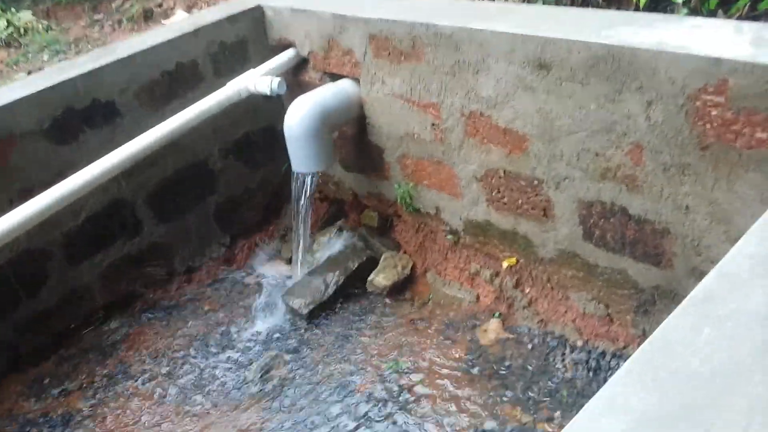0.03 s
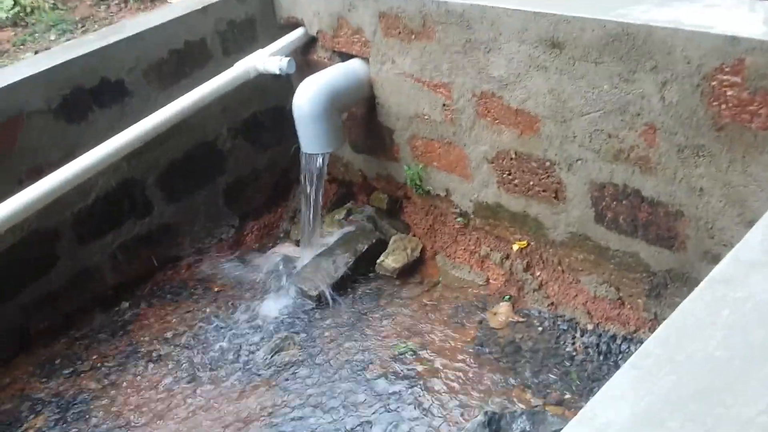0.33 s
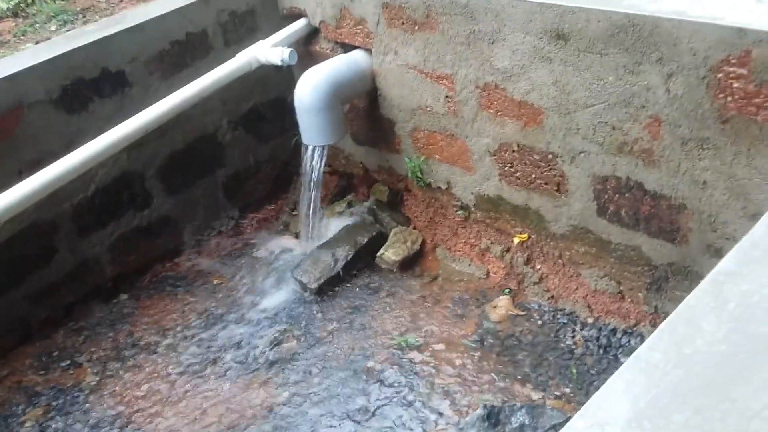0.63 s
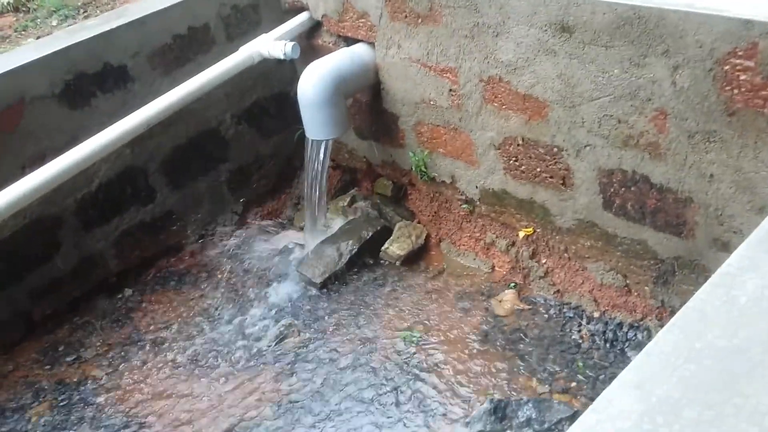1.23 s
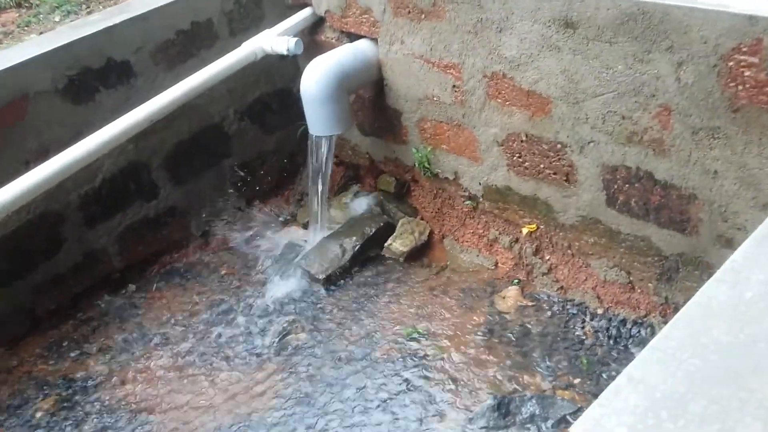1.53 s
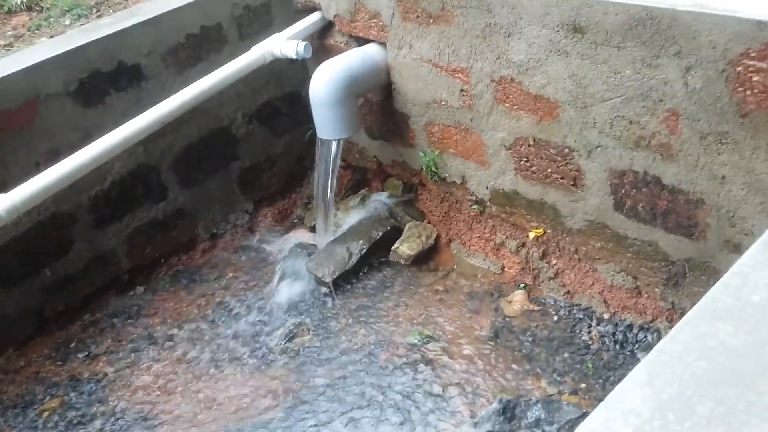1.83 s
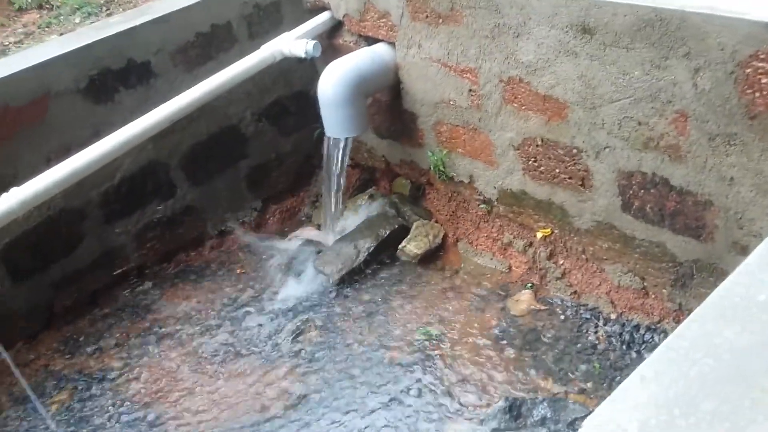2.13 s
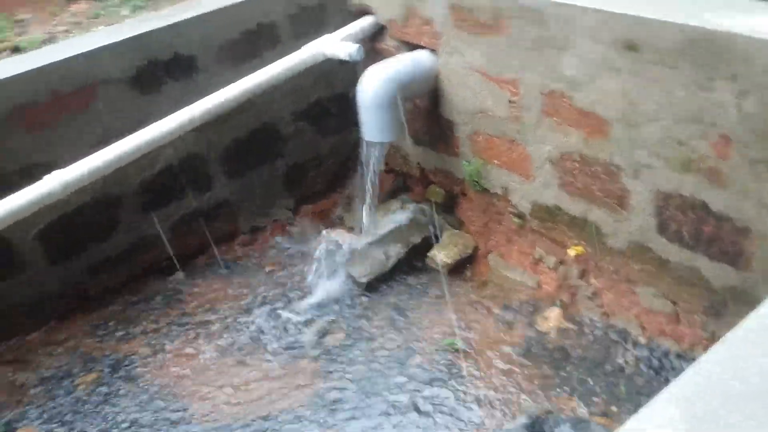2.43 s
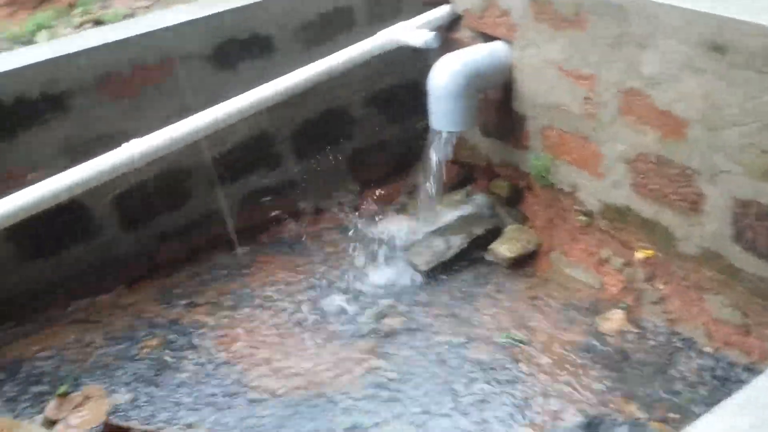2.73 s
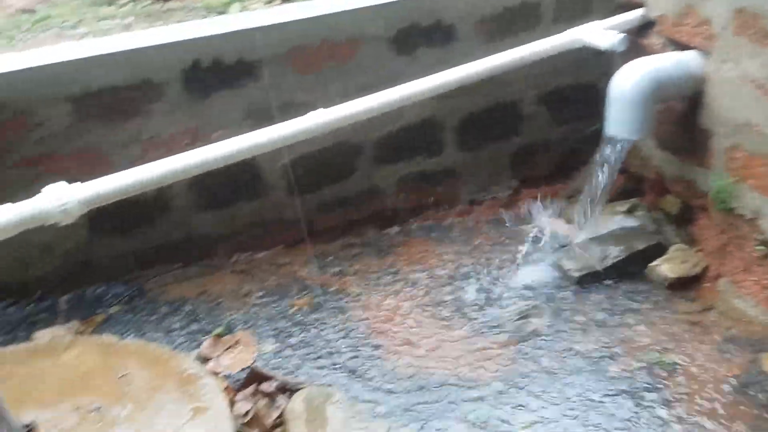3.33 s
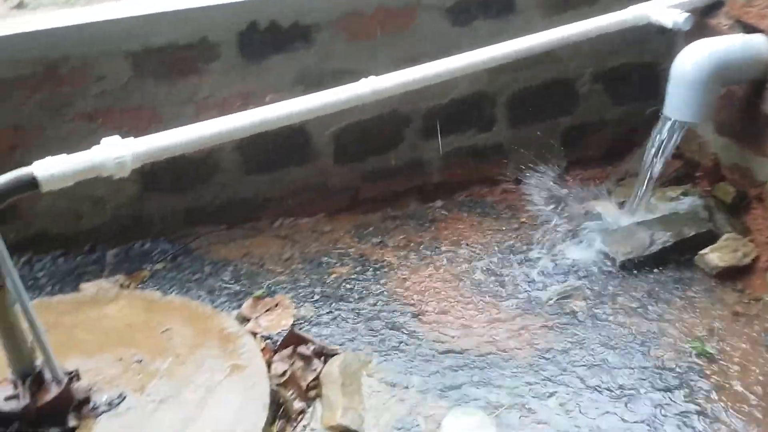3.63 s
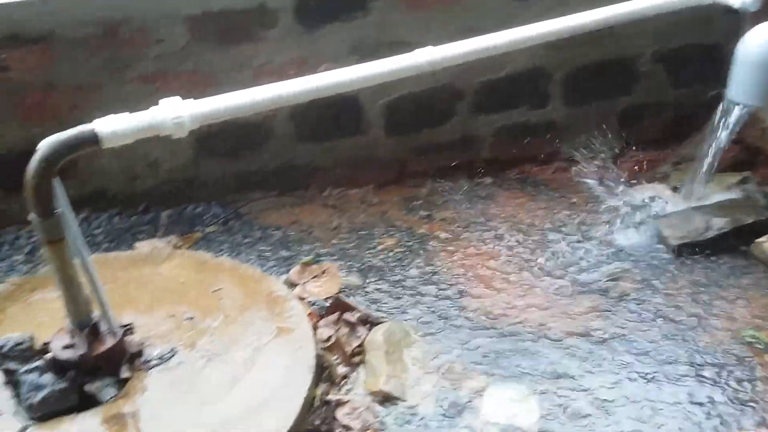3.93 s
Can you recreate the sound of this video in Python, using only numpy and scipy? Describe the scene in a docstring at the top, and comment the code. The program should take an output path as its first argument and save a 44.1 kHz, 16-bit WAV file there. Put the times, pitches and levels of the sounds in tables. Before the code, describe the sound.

A close, steady splash of water falling on a stone slab, with scattered raindrops.

```python
"""Close to a pipe pouring onto a stone slab and into a shallow pool between brick walls; one mono mic.
From the start the jet breaks into a fizz of droplets and tiny bubbles, and lumps of water slap the slab.
Light rain ticks, larger bubbles plink and spray flies. A breeze buffets the mic, hardest near 1.4 s.
From 2.57 to 3.6 s the mic steps aside and the splash changes colour; one more buffet follows at 3.7 s."""
import sys
import numpy as np
from scipy import signal
from scipy.fft import rfft, irfft
from scipy.io import wavfile

SR = 44100
rng = np.random.default_rng(int(sys.argv[2]) if len(sys.argv) > 2 else 0)


def wav_record(signal):
    """Record a signal, one row per channel, as 16-bit PCM in the file named by sys.argv[1]."""
    frames = np.transpose(np.atleast_2d(signal))
    bounded = np.clip(frames, -1, 1)
    # unit amplitude maps onto the largest positive 16-bit level
    quanta = np.round(bounded * 32767).astype(np.int16)
    wavfile.write(sys.argv[1], SR, quanta)


N = 176400
T = np.arange(N) / SR
DURATION_S = N / SR


def undb(db):
    """Decibels to gain."""
    return 10 ** (np.asarray(db) / 20)


def unit(x):
    """Scale to rms 1."""
    return x / np.sqrt(np.mean(x ** 2))


def curve(rows):
    """Join (t/s, value) rows by straight lines."""
    return np.interp(T, *np.array(rows).T)


def add(out, at, x):
    """Mix x into out at a time in seconds."""
    i = int(np.clip(at * SR, 0, N - 1))
    out[i:i + len(x)] += x[:N - i]


def scatter(per_s):
    """Random events as rows of t/s, size, pitch; the last two run from 0 to 1."""
    return rng.random((int(per_s * DURATION_S), 3)) * [DURATION_S, 1, 1]


def wander(hz):
    """Random drift of rms 1 that turns hz times a second."""
    return unit(np.interp(T * hz, np.arange(4000), rng.standard_normal(4000)))


def colour(x, points):
    """Minimum-phase filter through (f/Hz, gain/dB) points."""
    hz, db = np.array(points).T
    f = np.arange(N // 2 + 1) * SR / N + 1
    gain = undb(np.interp(np.log(f), np.log(hz), db))
    cepstrum = irfft(np.log(gain), N)
    cepstrum[1:N // 2] *= 2
    cepstrum[N // 2 + 1:] = 0
    return irfft(rfft(x) * np.exp(rfft(cepstrum)), N)


def band(x, hz, width):
    """Bell-shaped band of x around hz, at rms 1; width is a share of the centre."""
    f = np.arange(N // 2 + 1) * SR / N + 1
    return unit(irfft(rfft(x) * np.exp(-2 * (np.log(f / hz) / width) ** 2), N))


def fizz(classes=16, decay_cycles=3.44, rise_per_cycle=0.0056):
    """Swarms of tiny bubbles ring for a few cycles, rising in pitch; the smaller, the more of them."""
    out = np.zeros(N)
    edges_hz = np.geomspace(700, 15500, classes + 1)
    for low, high in zip(edges_hz, edges_hz[1:]):
        t = T[:int(5 * decay_cycles / low * SR)]
        swarm = np.zeros(N)
        for at, size, pitch in scatter(per_s=312.5 * np.sqrt(low / 4000)):
            cycles = (low + (high - low) * pitch) * t
            db = 5 * min(-np.log(size), 3)
            ring = np.sin(2 * np.pi * cycles * (1 + rise_per_cycle * cycles))
            add(swarm, at, undb(db) * np.exp(-cycles / decay_cycles) * ring)
        out += unit(swarm) * np.sqrt(high - low)  # equal power per Hz in every size class
    return unit(out)


def droplets(per_s=4500, spread_db=4.5):
    """Droplets land as randomly timed clicks of uneven size."""
    lands = rng.random(N) < per_s / SR
    strength = undb(spread_db * np.minimum(rng.standard_normal(N), 2))
    return unit(lands * strength * rng.choice([-1, 1], N))


def splash(step_start_s=2.57, step_end_s=3.6):
    """Fizz, droplets and a smooth wash surge with the jet; their colour turns as the mic steps aside."""
    # loudness of the splash at the mic: t/s, level/dB
    flow = [(0, -27), (.3, -25.5), (.47, -27.5), (.58, -26), (.72, -27), (.85, -27), (1.0, -27.5),
            (1.2, -26.5), (1.45, -27.5), (1.65, -26.5), (2, -26), (2.11, -28), (2.2, -26), (2.35, -26.5),
            (2.4, -27), (2.8, -27), (3.05, -28), (3.24, -25.5), (3.31, -27.5), (3.42, -27.5), (3.66, -26),
            (3.74, -28), (3.9, -26), (4, -28.5)]
    # its colour with the mic facing the pipe: f/Hz, gain/dB
    front_colour = [(100, -17), (250, -5), (500, -8), (730, -8.5), (1060, -1), (1430, -5), (1850, 0),
                    (2150, -3), (2500, -6), (2900, -9.5), (3500, -7), (4170, -0.9), (4650, -2),
                    (5100, -1.4), (6200, -4.5), (7600, -9), (8700, -9), (11000, -15.5), (15500, -23)]
    # its colour from the side: f/Hz, gain/dB
    side_colour = [(100, -4), (250, -2.5), (550, -8.5), (750, -9.5), (1020, -2.5), (1500, -3.5), (2050, 0),
                   (2500, -3), (3400, -7), (4200, -4.5), (5200, -2), (6800, -4), (8000, -7), (9500, -15),
                   (11500, -14.5), (15500, -23)]
    water = fizz() + undb(1) * droplets() + undb(1.5) * rng.standard_normal(N)
    water *= undb(0.72 * wander(hz=44.85))  # slight, fast surges
    front = unit(colour(water, front_colour))
    side = unit(colour(water, side_colour))
    aside = np.clip((T - step_start_s) / (step_end_s - step_start_s), 0, 1)
    return undb(curve(flow)) * ((1 - aside) * front + aside * side)


def mist(level_db=-52.5, flicker_db=6):
    """The finest droplets sizzle in quick uneven puffs."""
    puffs = undb(level_db + flicker_db * wander(hz=55))
    return puffs * band(rng.standard_normal(N), hz=10100, width=0.54)


def slap(hz, contact_ms, damping, lead_s):
    """A push on the stone at lead_s (short: a smack, long: a plop), then a damped swing of the water."""
    omega = 2 * np.pi * np.fft.rfftfreq(1024, 1 / SR)
    s, resonance = 1j * omega, 2 * np.pi * hz
    push = np.exp(-.5 * (omega * contact_ms / 1000) ** 2 - s * lead_s)
    swing = s ** 2 / (s ** 2 + damping * resonance * s + resonance ** 2)
    hit = irfft(push * swing)
    return hit / np.abs(hit).max()


def slaps(lead_s=0.002013, spatter_s=0.0026, slosh_s=0.0039):
    """Big lumps of water hit the slab, spatter and slosh off it; small ones patter in between."""
    # big lumps landing: t/s, peak/dB, f/Hz, contact/ms, damping (bandwidth over f)
    lumps = [(0.1083, -12.5, 1150, 0.13, 0.74), (0.166, -16, 243, 0.28, 0.99),
             (0.1848, -12.5, 333, 0.15, 0.31), (0.3312, -13.5, 388, 0.42, 0.78),
             (0.3549, -18.5, 330, 0.66, 1.7), (0.3741, -16, 328, 0.17, 0.53), (0.3872, -11, 330, 0.35, 1.8),
             (0.4451, -13.5, 280, 0.12, 0.47), (0.7481, -15.5, 390, 0.11, 0.39),
             (0.8105, -18, 390, 0.45, 0.72), (0.815, -20.5, 390, 0.16, 0.45),
             (0.9145, -12.5, 280, 0.084, 2.5), (1.3657, -13, 240, 0.11, 0.41),
             (1.4159, -15, 330, 0.083, 0.8), (1.5086, -10.5, 327, 0.065, 0.39),
             (1.5129, -19, 330, 0.086, 0.45), (1.5918, -11.5, 200, 0.13, 0.48),
             (1.6118, -11, 1150, 0.13, 0.45), (1.6284, -12.5, 170, 0.12, 1.5),
             (1.7448, -13.5, 240, 0.44, 1.7), (1.7471, -18, 550, 0.06, 1.1),
             (1.7934, -19.5, 390, 0.17, 0.38), (1.8385, -17, 240, 0.31, 0.58),
             (1.8898, -13, 280, 0.11, 1.1), (1.9333, -16, 280, 0.15, 0.73), (2.0504, -18, 280, 0.49, 1.2),
             (2.0707, -11.5, 278, 0.15, 0.6), (2.1371, -17, 330, 0.11, 0.45), (2.1672, -15, 280, 0.19, 0.8),
             (2.1871, -15, 705, 0.57, 0.53), (2.2016, -12.0, 330, 0.1, 1.5),
             (2.2114, -15.5, 1150, 0.2, 1.5), (2.2321, -12, 327, 0.11, 0.45),
             (2.2421, -18, 328, 0.13, 0.37), (2.282, -16.0, 330, 0.17, 0.38), (2.6152, -15, 240, 0.17, 1.1),
             (2.6488, -16.5, 240, 0.1, 0.4), (2.6771, -18.5, 280, 0.18, 1.7),
             (2.7188, -15, 278, 0.15, 0.35), (2.7896, -12.5, 390, 0.37, 1.5), (2.83, -16, 285, 0.15, 0.5),
             (2.9936, -15, 197, 0.15, 0.45), (3.022, -18.5, 550, 0.52, 1.5), (3.0524, -9, 550, 0.12, 1.5),
             (3.1668, -16, 170, 0.17, 0.59), (3.2382, -13.5, 330, 0.12, 0.6),
             (3.364, -14.0, 280, 0.27, 0.51), (3.3684, -25, 390, 0.12, 0.5),
             (3.4541, -18.0, 240, 0.17, 0.51), (3.4776, -18.5, 280, 0.24, 1.5),
             (3.5138, -14, 170, 0.18, 1.3), (3.782, -21.5, 240, 0.77, 1.1), (3.9715, -19, 280, 0.15, 0.65),
             (3.979, -22, 330, 0.3, 0.6)]
    hits, spatter, slosh = np.zeros((3, N))
    t = T[:2048]
    for at, db, hz, contact_ms, damping in lumps:
        add(hits, at - lead_s, undb(db) * slap(hz, contact_ms, damping, lead_s))
        add(spatter, at, undb(db - 12.5) * np.exp(-t / spatter_s))
        add(slosh, at, undb(db - 20.5) * t / slosh_s * np.exp(1 - t / slosh_s))
    for at, size, pitch in scatter(per_s=55):
        patter = slap(hz=190 * 4 ** pitch, contact_ms=0.15, damping=0.56, lead_s=lead_s)
        add(hits, at, undb(-31 + 10 * size) * patter)
    slosh *= band(rng.standard_normal(N), hz=386, width=1.0)
    spatter *= band(rng.standard_normal(N), hz=1300, width=0.99)
    return hits + slosh + spatter


def tick(hz, decay_cycles=0.72):
    """One drop bursts on something hard and dies within a cycle or two."""
    cycles = hz * T[:128]
    return np.exp(-cycles / decay_cycles) * np.cos(2 * np.pi * cycles)


def rain(centre_hz=5200):
    """Lone drops tick on the wall and the pipes, each at its own pitch; a few land close by."""
    # raindrops close to the mic: t/s, peak/dB, f/Hz
    close_drops = [(0.215, -18, 6200), (0.503, -14, 5000), (1, -6, 4500), (1.1207, -12, 4800),
                   (1.2048, -13, 4000), (1.8163, -15, 8400), (2.0439, -9, 5700), (2.315, -8, 4000),
                   (3.1062, -12, 2750), (3.167, -23, 2100), (3.6385, -13, 5500)]
    out = np.zeros(N)
    for at, db, hz in close_drops:
        add(out, at, undb(db) * tick(hz))
    for at, size, pitch in scatter(per_s=90):
        add(out, at, undb(-17 - 17 * size) * tick(centre_hz * 2 ** (pitch - .5)))
    return out


def plink(hz, decay_cycles, swell_cycles=2.5):
    """One bubble swells and rings out."""
    cycles = hz * T[:SR // 20]
    swell = 1 - np.exp(-(cycles / swell_cycles) ** 2)
    ring = swell * np.exp(-cycles / decay_cycles) * np.sin(2 * np.pi * cycles)
    return ring / ring.max()


def bubbles(low_hz=1516, high_hz=5890):
    """A few larger bubbles plink; many fainter ones ping in the pool."""
    # bubbles that stand out of the fizz: t/s, peak/dB, f/Hz
    large_bubbles = [(.375, -17, 4140), (1.1975, -18, 4270), (1.203, -14, 4120), (1.207, -20, 4170),
                     (1.509, -29.5, 393), (3.365, -25, 566), (1.956, -16, 4970), (3.1012, -12, 1980),
                     (3.108, -20, 1880), (3.117, -21, 2100), (3.724, -24, 2870), (3.741, -22, 2060),
                     (3.778, -18, 2100), (3.871, -22, 2300)]
    out = np.zeros(N)
    for at, db, hz in large_bubbles:
        add(out, at, undb(db) * plink(hz, decay_cycles=4.5))
    for at, size, pitch in scatter(per_s=70):
        hz = low_hz * (high_hz / low_hz) ** pitch
        add(out, at, undb(-33.5 - 10 * size) * plink(hz, decay_cycles=17.5))
    return out


def sprays():
    """Handfuls of fine droplets fly off the slab and land together."""
    # bursts of spray: t/s, level/dB, centre f/Hz, half-length/s
    bursts = [(.376, -31, 4800, .022), (0.556, -27.5, 4800, 0.0092), (1.104, -32, 9500, .012),
              (1.176, -26, 5600, .011), (1.204, -27, 4330, 0.009), (1.247, -32, 4600, 0.018),
              (1.516, -29, 4800, 0.011), (1.546, -29.5, 4800, 0.013), (1.603, -32, 6500, 0.018),
              (1.638, -30, 4670, 0.02), (1.85, -29.5, 4800, .02), (1.966, -29, 5000, .012),
              (2.306, -30.5, 4380, .02), (2.353, -27.5, 4420, 0.0069), (2.796, -28.5, 5030, 0.018),
              (2.966, -29.5, 5430, .014), (3.425, -30.5, 6160, 0.036), (3.636, -31, 6500, 0.013),
              (3.686, -22, 5800, 0.0044), (3.878, -30, 7100, 0.014), (3.94, -31.5, 6800, 0.037)]
    drops = droplets() + rng.standard_normal(N)
    out = np.zeros(N)
    for at, db, hz, half_s in bursts:
        swell = np.exp(-((T - at) / half_s) ** 2)
        out += undb(db) * swell * band(drops, hz, width=0.45)
    return out


def breeze(sag_per_s=15, octave_db=-13.5):
    """Gusts rumble on the mic; single eddies thump it, sagging in pitch."""
    # wind on the mic: t/s, level/dB
    gusts = [(0, -42.5), (.5, -40.5), (.63, -44), (.72, -39), (.8, -39.5), (.92, -40.5), (1.15, -45),
             (1.24, -35.5), (1.34, -38), (1.39, -32), (1.46, -28.5), (1.52, -39.5), (1.68, -38),
             (1.78, -30.5), (1.9, -40.5), (2.1, -38.5), (2.67, -47.5), (2.85, -38.5), (2.93, -39),
             (3.04, -40), (3.12, -29.5), (3.27, -42), (3.4, -34.5), (3.48, -30), (3.62, -36), (3.71, -33),
             (3.78, -39.5), (4, -46)]
    # colour of its rumble: f/Hz, gain/dB
    rumble_colour = [(25, -29), (35, -31), (48, -8), (65, -1), (125, -1), (200, -7), (350, -37), (900, -38)]
    # eddies striking the mic: t/s, level/dB, f/Hz, half-length/s
    buffets = [(.625, -29.5, 111, 0.015), (1.387, -9, 134, 0.0043), (1.44, -21, 108, 0.014),
               (2.93, -33, 105, 0.018), (3.46, -25, 120, 0.01), (3.699, -9, 121, 0.0049)]
    out = undb(curve(gusts)) * unit(colour(rng.standard_normal(N), rumble_colour))
    for at, db, hz, half_s in buffets:
        t = T - at
        swell = np.exp(-np.abs(t / half_s) ** 1.2)
        phase = 2 * np.pi * hz * t * (1 - sag_per_s * t / 2)
        octave = undb(octave_db) * swell * np.sin(2 * phase)
        out += undb(db) * swell * (np.sin(phase) + octave)
    return out


def scene():
    """All sources at one mic, the same in both channels."""
    mono = splash() + mist() + slaps() + rain() + bubbles() + sprays() + breeze()
    return np.array([mono, mono])


def record(dry):
    """The recorder cuts the bass below 38 Hz and the top above 15.8 kHz."""
    low_cut = signal.butter(4, 38, "high", fs=SR, output="sos")
    high_cut = signal.ellip(10, .1, 90, 15800, fs=SR, output="sos")
    return signal.sosfilt(high_cut, signal.sosfilt(low_cut, dry))


dry = scene()
out = record(dry)
wav_record(out)
```